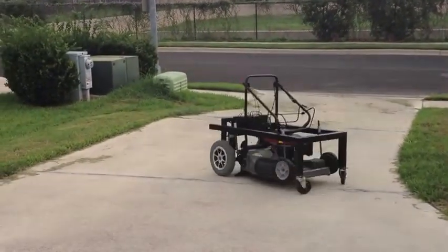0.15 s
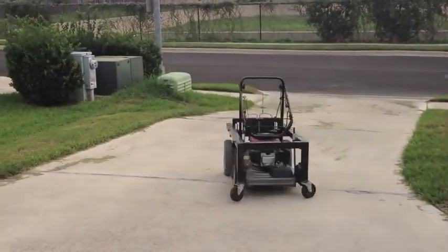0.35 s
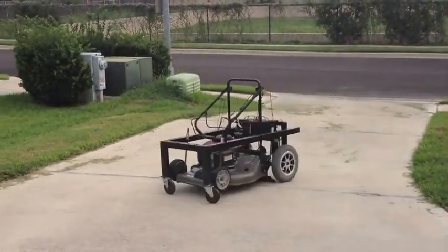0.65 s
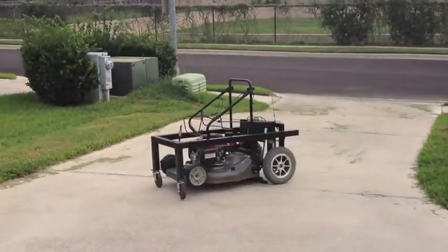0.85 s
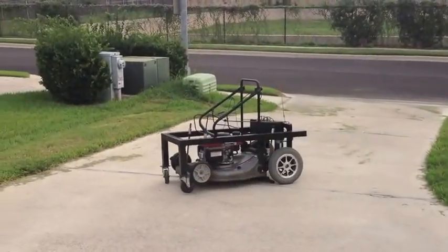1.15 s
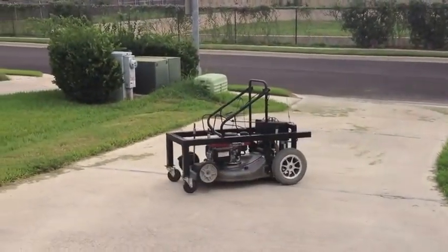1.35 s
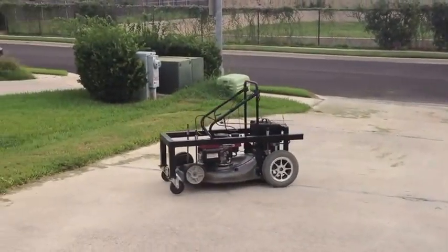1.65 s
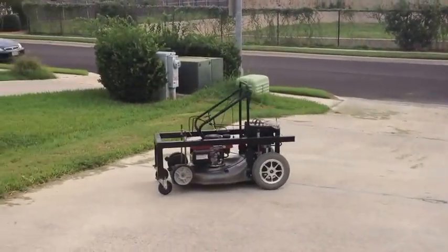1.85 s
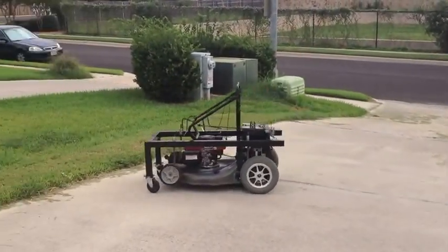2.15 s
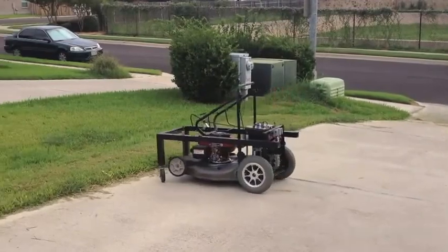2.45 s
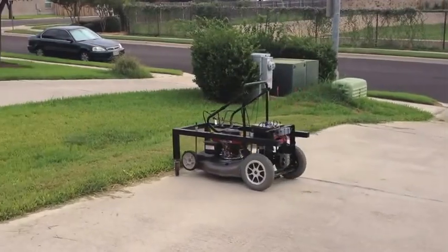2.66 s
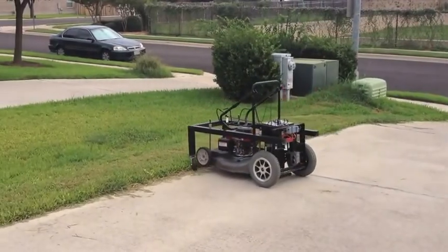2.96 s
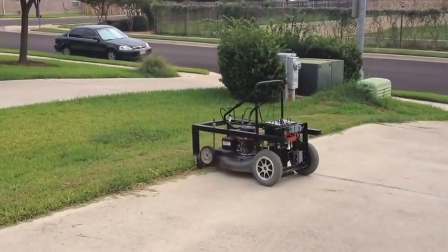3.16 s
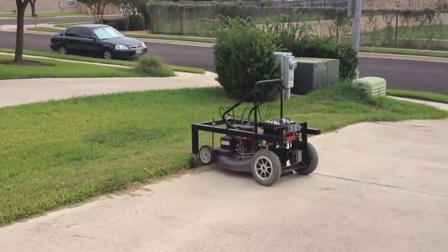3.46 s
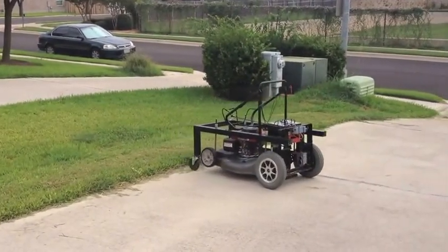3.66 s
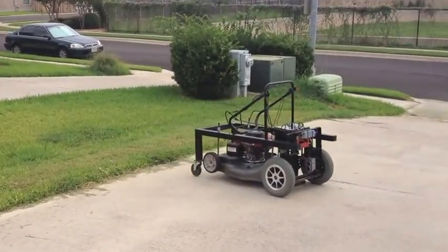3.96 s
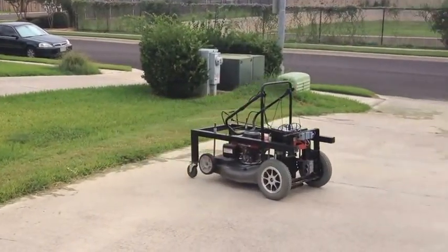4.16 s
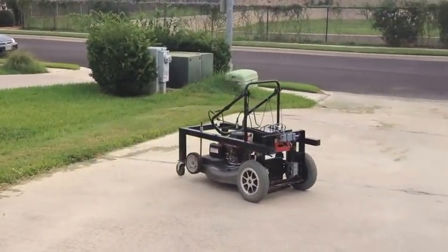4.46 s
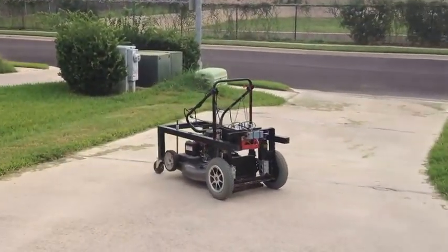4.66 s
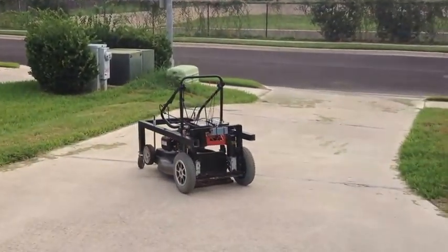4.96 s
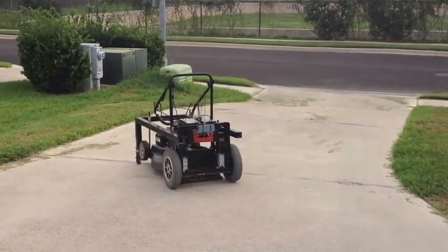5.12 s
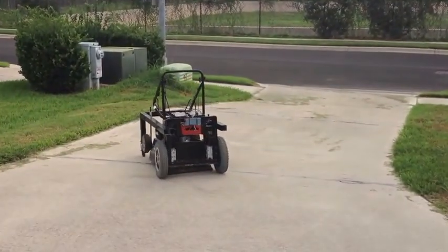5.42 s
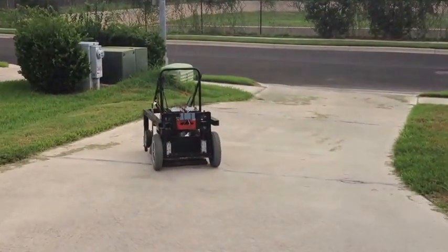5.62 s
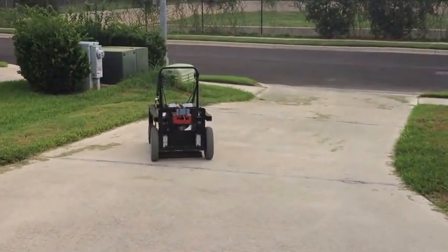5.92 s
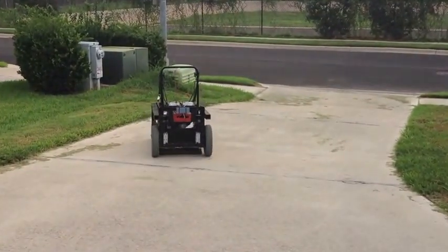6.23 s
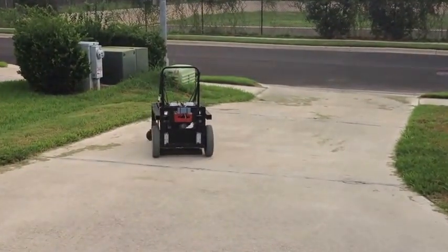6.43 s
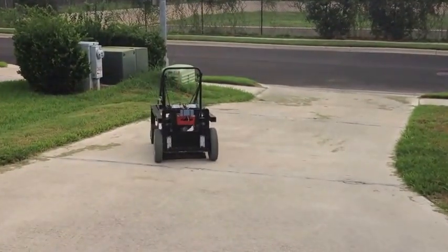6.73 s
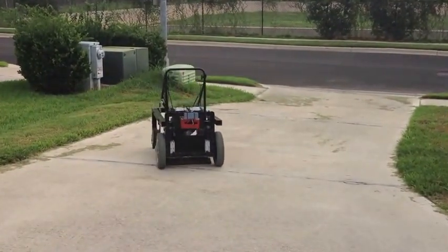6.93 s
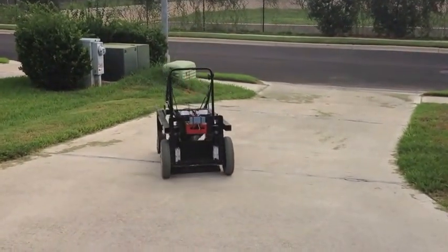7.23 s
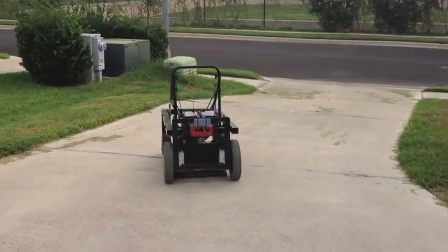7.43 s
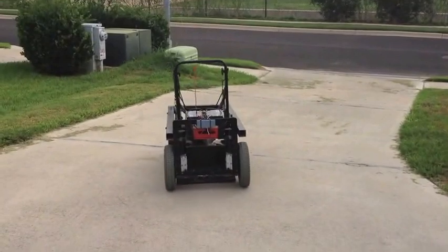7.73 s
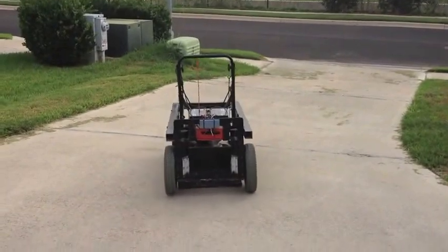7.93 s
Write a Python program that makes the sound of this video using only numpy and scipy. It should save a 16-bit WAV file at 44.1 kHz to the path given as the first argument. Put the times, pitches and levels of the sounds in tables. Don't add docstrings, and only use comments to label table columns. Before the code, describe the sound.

A motorized steel-framed cart skids with loud clattering knocks, then whirs and grinds over a concrete driveway, rattling, pausing, juddering and growing louder.

```python
import sys
import numpy as np
from scipy import signal
from scipy.fft import rfft, irfft, next_fast_len
from scipy.io import wavfile
from scipy.ndimage import uniform_filter1d, map_coordinates

SR = 44100
rng = np.random.default_rng(int(sys.argv[2]) if len(sys.argv) > 2 else 0)


def transcribe(signal):
    frames = np.atleast_2d(signal).T
    limited = np.clip(frames, -1, 1)
    pcm = np.round(limited * 32767).astype(np.int16)
    wavfile.write(sys.argv[1], SR, pcm)


def invert_db(x):
    u = np.asarray(x, float) / 20
    return 10 ** u


N = 356548


def unit(x):
    return x / np.sqrt(np.mean(x ** 2) + 1e-20)


def along(points, hz):
    f, v = np.transpose(points)
    return np.interp(np.log(hz + 1), np.log(f + 1), v)


def wobble(rate):
    knots = rng.standard_normal(int(N * rate / SR) + 4)
    return map_coordinates(knots, [np.arange(N) * rate / SR])


def coloured(x, spectrum):
    size = 4096
    gain = np.maximum(invert_db(along(spectrum, np.fft.rfftfreq(size, 1 / SR))), 1e-4)
    cepstrum = irfft(np.log(gain))
    cepstrum[1:size // 2] *= 2
    cepstrum[size // 2 + 1:] = 0
    response = irfft(np.exp(rfft(cepstrum)))
    return signal.fftconvolve(x, response / np.linalg.norm(response))[:N]


def patchy(depth_db):
    z = signal.stft(rng.standard_normal(N), nperseg=512)[2]
    field = uniform_filter1d(rng.standard_normal(z.shape), size=5, axis=0)
    field = uniform_filter1d(field, size=6, axis=1)
    return unit(signal.istft(z * invert_db(depth_db * unit(field)), nperseg=512)[1][:N])


def grains(per_second, spread_db, t60):
    chance, size = rng.random(N), rng.uniform(0.034, 1, N)
    hits = (chance < per_second / SR) * invert_db(spread_db * size)
    return unit(signal.lfilter([1], [1, -invert_db(-60 / (t60 * SR))], hits))


def pings(table, crack, voices, detune):
    out, t = np.zeros(N + SR), np.arange(SR // 6) / SR
    dull = signal.butter(2, [1200, 5600], "band", fs=SR, output="sos")
    offsets = rng.standard_normal((len(table), voices, 1))
    for (s, db, hz, t60), offset in zip(table, offsets):
        ring = np.sin(2 * np.pi * hz * (1 + detune * offset) * t).mean(axis=0)
        ring = ring * invert_db(-60 * t / t60) * (1 - np.exp(-t / 0.0023))
        noise = signal.sosfilt(dull, rng.standard_normal(len(t)))
        snap = crack * noise * invert_db(-60 * t / 0.0025)
        out[round(s * SR):][:len(t)] += invert_db(db) * (ring + snap)
    return out[:N]


# [t/s, caster grinding level/dB, motor effort level/dB]
DRIVE = [(0.43, -56, -54.5), (0.97, -69, -57.5), (1.7, -58, -56.5), (2.62, -55, -53.5), (2.78, -66, -58),
         (3.4, -74.5, -82), (3.54, -54, -56), (3.72, -50, -53.5), (4.57, -46.5, -50), (4.64, -58, -58),
         (4.862, -65.5, -61), (5.11, -62, -56), (5.31, -56.5, -55.5), (5.95, -54, -56.5), (6.2, -48, -58),
         (6.9, -49, -49), (7.14, -51, -59.5), (7.6, -51.5, -51), (8.08, -46.5, -44.5)]
# [t/s, swell/s, hold/s, extra level/dB]
SKIDS = [
    (0.0, .05, 0.38, 21),
    (0.728, 0.23, 0.0087, 23.5),
    (6.565, 0.36, 0.097, 13.5),
]


def controls():
    t = np.arange(N) / SR
    s, *levels = np.transpose(DRIVE)
    roll_db, motor_db = [np.interp(t, s, c) for c in levels]
    release_s, motor_share = 0.05, 0.61
    skid_db = np.zeros(N)
    for at, swell, hold, db in SKIDS:
        corners = np.cumsum([at - swell, swell, hold, release_s])
        skid_db += np.interp(t, corners, [0, db, db, 0])
    grind_db = roll_db + skid_db
    over_db = grind_db + 52
    rumble_db = -47.5 + 0.63 * over_db
    grit_db = -60 + 0.77 * over_db
    return grind_db, rumble_db, motor_db + motor_share * skid_db, grit_db


# [f/Hz, level/dB per Hz]
BODY = [(41, -30), (70, -45.5), (162, -4.5), (214, 1), (270, -5), (390, -6), (432, -12.5), (577, -5),
        (787, -7), (1040, -13.5), (1100, -14), (1430, -16.5), (2420, -120)]
# [f/Hz, level/dB per Hz]
WHIR = [(530, -42.5), (900, 5), (1030, -14), (1160, 5.5), (1290, 1.5), (1730, 11), (2130, 6), (2440, 10),
        (2690, -41), (3000, -64), (3900, -34), (6600, -120)]
# [f/Hz, level/dB per Hz]
GRIND = [(1590, -12.5), (2700, 5), (2980, 6), (3350, 11.5), (3790, 14.5), (4210, 9.5), (5230, -9),
         (5500, 1), (7150, -83), (12100, -120)]
# [f/Hz, level/dB per Hz]
GRIT = [(3120, -29), (5300, -9), (6120, -1), (6790, 4), (7740, 6), (9020, -1.5), (10100, -7.5), (11500, -1),
        (11900, -1.5), (12900, -5.5), (14800, -11), (15600, -19)]


def rolling():
    grind_db, rumble_db, whir_db, grit_db = controls()
    bumps = unit(invert_db(1.2 * wobble(30)) * (1.8 + grains(200, spread_db=4, t60=.04)))
    crunch = unit(2.6 + grains(300, spread_db=6, t60=0.008))
    rumble = invert_db(rumble_db + 0.21 * wobble(13)) * coloured(bumps * patchy(depth_db=2.0), BODY)
    whir = invert_db(whir_db + 0.54 * wobble(15)) * coloured(bumps * crunch * patchy(depth_db=0.5), WHIR)
    muffled = signal.sosfilt(signal.butter(3, 1950, fs=SR, output="sos"), whir)
    openness = np.clip((grind_db + 66) / 14, 0, 1)
    whir = muffled + openness * (whir - muffled)
    grind = invert_db(grind_db) * coloured(bumps * crunch * patchy(depth_db=1.5), GRIND)
    grit = invert_db(grit_db) * coloured(bumps * crunch * patchy(depth_db=0.8), GRIT)
    return rumble + whir + grind + grit


# [f/Hz, width/Hz, level/dB]
HOUSING = [(230.5, 13, -5.5), (1150, 12, -19), (1596, 73, 3), (1787, 13, -4), (2357, 14, -20),
           (2540, 47, 9)]


def housing(x):
    size = next_fast_len(N + SR // 4)
    f = np.fft.rfftfreq(size, 1 / SR)
    gain = 1
    for c, w, db in HOUSING:
        gain = gain + invert_db(db) * 1j * f * w / (c * c - f * f + 1j * f * w)
    return irfft(rfft(x, size) * gain, size)[:N]


# [t/s, peak level/dB, hardness/dB, bracket clank level/dB, t60/s]
BLOWS = [(0.083, -22, 5, 6, 0.21), (0.092, -18, 0, 4.5, 0.19), (0.117, -14.5, 1, -4, 0.58),
         (0.152, -19, 15.5, 14, 0.027), (0.209, -12.5, 6.5, -8, 0.11), (0.315, -25, 15, -5, 0.11),
         (0.325, -14.5, -14, 4, 0.078), (0.601, -39, 20, 13, 0.076), (0.619, -27, 2, 1, 0.24),
         (0.624, -18, 6.5, 7, 0.19), (0.635, -10, 4.5, -15, 0.11), (0.664, -13.5, 3, 2, 0.085),
         (0.736, -24, -7, -1, 0.77), (1.227, -22.5, -9, -0.5, 0.12), (1.4405, -19.5, -6, -4, 0.24),
         (2.141, -32.5, 11, 7, 0.24), (2.158, -29, -4, -14, 0.32), (4.503, -13, -3.5, -3, 0.3),
         (4.652, -12, -1, -3, 0.21), (4.719, -23.5, -2, -7, 0.23), (7.624, -22, -1, -6.5, 0.27),
         (7.649, -22.5, -10.5, -30, 0.2), (7.685, -15, -2, -11, 0.067), (7.766, -20.5, -2, -12, 0.21)]


def blows():
    return [(s, db, -12.5 - 0.68 * hard, clank_db, -20.5 + hard, t60, 0)
            for s, db, hard, clank_db, t60 in BLOWS]


# [t/s, peak level/dB, weight/dB, t60/s]
RATTLES = [(0.047, -40, -11, 0.07), (0.407, -27, 4.5, 0.22), (0.829, -39, 0.5, 0.26),
           (2.081, -38.5, 4, 0.6), (2.492, -36, 4.5, 0.097), (2.595, -38, 4.5, 0.14),
           (2.622, -28.5, -1, 0.081), (2.669, -32.5, -5.5, 0.26), (2.719, -35.5, 2.5, 0.18),
           (5.046, -44, 6, 0.19), (5.237, -32, 2.5, 0.24), (5.274, -35, 7.5, 0.16), (5.297, -33, 0, 0.086),
           (5.755, -37.5, 6.5, 0.31), (5.793, -35, -4.5, .2), (5.818, -37, -7, 0.26),
           (6.25, -28, -7, 0.034), (6.283, -28.5, -2, 0.12), (6.871, -37, 0, 0.067), (6.944, -32, 1, 0.32),
           (7.052, -31.5, -2, 0.25), (7.163, -32, -2.5, 0.51), (7.22, -31.5, -2, 0.11),
           (7.309, -35, -4.5, 0.33), (7.369, -36, -2, 0.16), (7.442, -30.5, 0, 0.2), (7.536, -30, 3, 0.2),
           (7.737, -36, 5, 0.11), (7.795, -29.5, 1.5, 0.28), (7.886, -31.5, 0, 0.29),
           (7.959, -34, 1, 0.064), (8.012, -27.5, 1.5, 0.26)]


def rattles():
    hold_s = 0.0091
    return [(s, db, -5.5 + heavy, -0.82, -21.5 - 0.68 * heavy, t60, hold_s)
            for s, db, heavy, t60 in RATTLES]


# [t/s, peak level/dB]
THUMPS = [(0.493, -33), (1.967, -37.5), (2.015, -38.5), (2.057, -35.5), (2.253, -40), (2.318, -41),
          (3.922, -33.5), (4.43, -35), (5.087, -34.5), (5.182, -37.5), (5.445, -34), (5.47, -37.5),
          (5.677, -33), (5.77, -44), (5.853, -35.5), (5.912, -33.5), (5.971, -37), (6.021, -33),
          (6.047, -38), (6.679, -30), (6.873, -42), (6.945, -46), (6.984, -34), (7.18, -43), (7.233, -35.5),
          (7.55, -39)]


def thumps():
    return [(s, db, 6.5, 1, -25, 0.05, 0) for s, db in THUMPS]


# [t/s, peak level/dB]
TAPS = [(0.255, -11.5), (0.378, -13.5), (1.299, -34), (1.653, -36), (1.713, -43), (1.765, -30),
        (1.863, -32.5), (3.787, -27), (3.995, -44), (4.344, -30), (4.607, -50), (5.381, -33), (5.544, -40),
        (6.202, -23), (7.932, -21)]


def taps():
    return [(s, db, -18, -47, -26, 0.037, 0) for s, db in TAPS]


# [t/s, peak level/dB]
SLIPS = [
    (6.324, -22),
    (6.365, -25),
    (6.408, -21.5),
    (6.453, -22),
    (6.497, -23),
    (6.541, -20.5),
    (6.586, -17.5),
    (6.631, -26),
]


def slips():
    return [(s, db, -8.5, -7, -21, 0.27, 0) for s, db in SLIPS]


def squeaks():
    late_s, squeak_hz, t60_s = 0.013, 11900, 0.018
    grips = [(s + late_s, db - 1, squeak_hz, t60_s) for s, db in SLIPS]
    return pings(grips, crack=0, voices=3, detune=.03)


def tray():
    tray_hz, t60_s = 590, 0.31
    return pings([(s, db - 15, tray_hz, t60_s) for s, db in SLIPS], crack=.1, voices=2, detune=.012)


# [f/Hz, level/dB, t60/s]
STEEL = [(195, -36, 0.43), (604, 14.5, 0.88), (1660, -31.5, 0.091), (1930, -22, 0.45), (2180, -25, 0.13),
         (2390, -18, 0.62), (2570, -59, 1.2), (3400, -18, 0.5), (3400, -27, 0.58), (4100, -23, 0.038),
         (4680, 1, 0.42), (4700, -25, 0.096), (5000, -14, 0.19), (4900, -27, 0.46), (6360, -13, 0.3),
         (6720, 19.5, 0.17), (7600, -24.5, 0.15), (7640, 2, 0.11), (7600, -34, 0.2), (8360, 18, 0.21),
         (9600, -7, 0.41), (8960, 15.5, 0.19)]


def jolts():
    contacts = blows() + rattles() + thumps() + taps() + slips()
    t = np.arange(SR // 3) / SR
    hz, level_db, ring_t60 = np.transpose(STEEL)[:, :, None]
    ring_db = level_db - 60 * t / np.clip(0.44 * ring_t60, .03, .3)
    rings = invert_db(ring_db) * np.sin(2 * np.pi * hz * t)
    part = np.digitize(hz[:, 0], [950, 2800, 5400])
    shake, frame = np.zeros((4, N + SR)), np.zeros(N + SR)
    scatter_db = 3 * rng.standard_normal((len(contacts), len(STEEL)))
    rise = 1 - np.exp(-t / .0018)
    for (s, db, knock_db, clank_db, crack_db, t60, hold), scatter in zip(contacts, scatter_db):
        start = round(s * SR)
        parts_db = db + np.array([knock_db - 5.0, clank_db - 12.5, -12, crack_db - 2.5])
        life = np.clip(t60, .015, .5)
        decay = invert_db(-60 * np.maximum(t - hold, 0) / life) + 0.23 * invert_db(-60 * t / 0.002)
        shake[:, start:][:, :len(t)] += invert_db(parts_db)[:, None] * decay * rise
        strengths = invert_db(parts_db[part] + scatter - 24.5)
        frame[start:][:len(t)] += strengths @ rings * invert_db(-25 * t / life)
    chatter = unit(1.2 + grains(350, spread_db=5, t60=.012))
    out = frame[:N]
    for envelope, voice in zip(shake, [BODY, WHIR, GRIND, GRIT]):
        out = out + coloured(envelope[:N] * chatter * patchy(depth_db=1.5), voice)
    return out


# [t/s, peak level/dB, f/Hz, t60/s]
CLANKS = [(0.047, -12.5, 1810, 0.023), (0.09, -16, 1760, 0.058), (0.495, -25, 645, 0.058),
          (0.565, -24, 530, 0.027), (0.641, -11.5, 2470, 0.068), (1.228, -23.5, 670, 0.039),
          (1.445, -30, 643, 0.069), (2.109, -38, 1760, 0.16), (2.156, -23, 1734, 0.054),
          (2.19, -38, 1810, 0.08), (2.43, -36, 1780, 0.096), (4.51, -22, 590, 0.1),
          (4.66, -24, 210.4, 0.15), (4.658, -21, 692, 0.049), (5.087, -49, 622, 0.38),
          (5.182, -36, 686, 0.038), (5.678, -15, 700, 0.012), (0.33, -21.5, 716, 0.093),
          (6.98, -34, 1680, .04), (7.053, -29.5, 1690, 0.054), (7.22, -28.5, 1665, 0.066),
          (7.371, -31, 850, 0.046), (7.442, -29.5, 1710, 0.078), (7.688, -24.5, 604, 0.097),
          (7.738, -13.5, 1690, 0.016)]


def clanks():
    return pings(CLANKS, crack=.1, voices=2, detune=.012)


# [t/s, peak level/dB, f/Hz, t60/s]
SLAPS = [
    (1.225, -26, 3600, 0.02),
    (1.44, -41, 3840, 0.084),
    (4.503, -24, 3640, 0.042),
    (5.258, -27, 3330, 0.059),
    (5.82, -28, 3300, .08),
]


def slaps():
    return pings(SLAPS, crack=2.2, voices=3, detune=.1)


# [t/s, peak level/dB, f/Hz]
TICKS = [(0.117, -14, 3700), (0.3254, -29, 3950), (0.601, -17.5, 4200), (0.8855, -26, 3840),
         (1.301, -15.5, 4540), (1.441, -10, 4030), (1.545, -22, 4000), (1.655, -24.5, 4160),
         (1.715, -32, 4240), (1.765, -26.5, 4150), (2.015, -27, 3850), (2.621, -29, 4100),
         (2.674, -19, 4320), (2.72, -34, 4270), (2.9058, -32.5, 4120), (3.399, -37.5, 4000),
         (4.6077, -12, 4730), (4.7376, -27, 4020), (5.049, -44, 3700), (5.321, -16.5, 4260),
         (5.544, -30, 4060), (6.6772, -30, 4000), (7.2323, -34, 4000), (7.372, -24, 2980),
         (7.6886, -25, 3930), (7.7667, -14, 3800)]


def ticks():
    t60_s = 0.013
    return pings([(*row, t60_s) for row in TICKS], crack=.6, voices=3, detune=.08)


# [t/s, bright peak level/dB, body peak level/dB, t60/s]
SNAPS = [(0.025, -43, -26, 0.014), (0.066, -38, -30, .03), (0.078, -32, -31, .03), (0.117, -19, -37, 0.023),
         (0.153, -33, -32, 0.034), (0.2088, -25, -22, 0.02), (0.216, -37, -28, 0.014),
         (0.254, -30, -41, 0.051), (0.407, -36.5, -30, .04), (0.55, -55, -43, 0.089),
         (0.6005, -28.5, -43, 0.016), (0.638, -17, -18, 0.0093), (0.6645, -29, -28, 0.019),
         (0.09, -34, -38, 0.019), (1.2253, -41.5, -37.5, 0.025), (2.016, -54, -41, 0.015),
         (0.741, -51, -33, 0.033), (0.829, -61, -37, 0.043), (1.2926, -57, -32, 0.011),
         (1.441, -45, -19.5, 0.018), (1.455, -43, -34, 0.018), (2.622, -46, -40, 0.014),
         (4.264, -44.5, -49, .03), (4.422, -50, -42, 0.045), (4.518, -49, -21.5, .03),
         (4.543, -39, -27, 0.054), (4.572, -38, -28.5, 0.048), (4.6563, -22.5, -40, 0.03),
         (4.736, -35, -42, .02), (4.9637, -58, -54, 0.018), (6.341, -49, -28, 0.025),
         (6.381, -43, -38, .02), (6.408, -41, -38, 0.017), (6.453, -35, -32, 0.024),
         (6.498, -30, -31, 0.018), (6.543, -28, -34, 0.022), (6.587, -32, -22, 0.022),
         (6.678, -44, -32, 0.026), (6.806, -52, -52, .03), (6.854, -44, -36, 0.023), (6.984, -50, -40, .03),
         (7.325, -55, -36, .02), (7.371, -62, -64, .02), (7.426, -50, -52, .02), (7.6868, -35, -41, .02),
         (7.7668, -41, -35, 0.017)]


def snaps():
    shake, t = np.zeros((2, N + SR)), np.arange(SR // 10) / SR
    for s, bright_db, body_db, t60 in SNAPS:
        peaks_db = np.array([[bright_db], [body_db]])
        shake[:, round(s * SR):][:, :len(t)] += invert_db(peaks_db - 60 * t / t60)
    bright, body = shake[:, :N] * rng.standard_normal((2, N))
    return coloured(bright, GRIT) + coloured(body, GRIND)


# [t/s, length/s, f/Hz, level/dB]
HUMS = [
    (0.85, 0.3, 1776, -59),
    (0.85, 0.4, 1460, -62),
    (1.998, 0.4, 214, -49),
    (2.464, 0.24, 235, -46.5),
    (4.759, 0.24, 1550, -61),
    (4.797, 0.27, 245, -59.5),
]


def hum():
    t, out = np.arange(N) / SR, np.zeros(N)
    drift_hz, flutter_db = 7 * wobble(12), 4 * wobble(20)
    climb_hz_per_s = 10
    for s, length, hz, db in HUMS:
        pitch_hz = hz + drift_hz + climb_hz_per_s * (t - s - length / 2)
        swell = np.sqrt(np.sin(np.pi * np.clip((t - s) / length, 0, 1)).clip(0))
        out += invert_db(db + flutter_db) * swell * np.sin(2 * np.pi * np.cumsum(pitch_hz) / SR)
    return out


# [f/Hz, t60/s]
WALLS = [(200, 0.53), (2000, 0.34), (10000, 0.031)]


def walls(x):
    hz, t, z = signal.stft(rng.standard_normal(SR // 2), SR, nperseg=256)
    tail = signal.istft(z * invert_db(-60 * t / along(WALLS, hz)[:, None]), SR, nperseg=256)[1]
    delayed = np.pad(x, (700, 0))
    return signal.fftconvolve(delayed, tail / np.linalg.norm(tail))[:N]


# [f/Hz, level/dB per Hz]
STREET = [(15, -73), (25, -64), (64, -18), (119, 4.5), (152, 3), (483, -13), (1050, 3), (1210, -2),
          (1420, 5.5), (2560, -12), (4760, -22), (6580, -17.5), (11000, -47), (13600, -15), (15600, -29)]


def street():
    swell_db = .6 * wobble(1.5)
    return invert_db(-54.5 + swell_db) * coloured(patchy(depth_db=0.8), STREET)


# [f/Hz, level/dB]
FACING = [(2400, 0), (2750, -3), (3400, -1), (4000, -1.5), (4600, 0), (9500, -0.5), (10800, 4.5),
          (12600, 0), (13100, -4), (15600, -6)]


def turned(x):
    turn_s, takes_s = 4.9, 0.25
    share = np.clip((np.arange(N) / SR - turn_s) / takes_s, 0, 1)
    facing = irfft(rfft(x) * invert_db(along(FACING, np.fft.rfftfreq(N, 1 / SR))), N)
    return x + share * (facing - x)


def scene():
    cart = housing(rolling()) + jolts() + clanks() + tray() + slaps()
    cart = cart + ticks() + snaps() + squeaks() + hum()
    return turned(cart + invert_db(-18.5) * walls(cart) + street())[None]


def top_cut(x):
    return signal.sosfilt(signal.butter(12, 15480, fs=SR, output="sos"), x)


# [f/Hz, width/Hz, depth 0-1]
DIPS = [(5400, 380, .7), (10250, 400, .7), (13600, 500, .5)]


def record(dry):
    hz = np.fft.rfftfreq(N, 1 / SR)
    dips = np.prod([1 - depth * np.exp(-((hz - c) / w) ** 2) for c, w, depth in DIPS], axis=0)
    bass_cut = signal.butter(2, 55, "high", fs=SR, output="sos")
    heard = irfft(rfft(signal.sosfilt(bass_cut, dry)) * dips * (hz < 15450), N)
    heard = heard + invert_db(-73.5) * signal.sosfilt(bass_cut, rng.standard_normal(N))
    top, knee = .4, 4
    heard = heard / (1 + np.abs(heard / top) ** knee) ** (1 / knee)
    return top_cut(heard)


dry = scene()
out = record(dry)
transcribe(out)
```